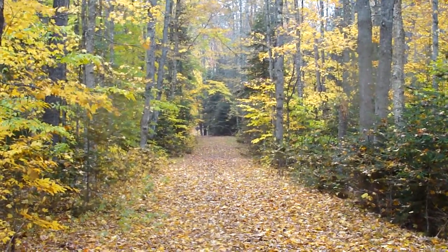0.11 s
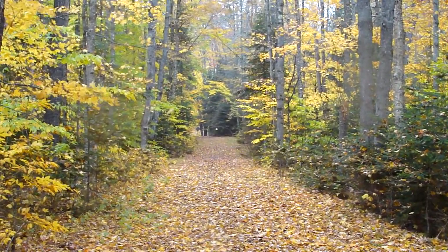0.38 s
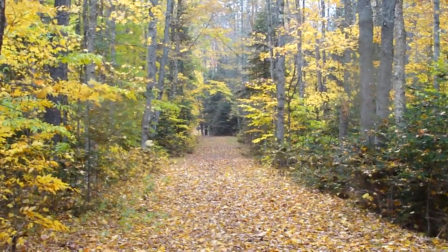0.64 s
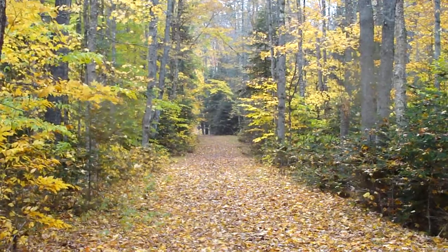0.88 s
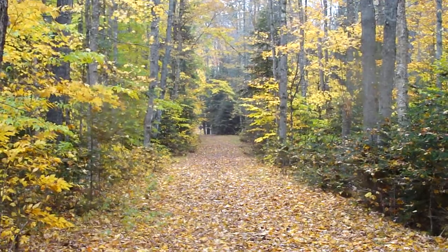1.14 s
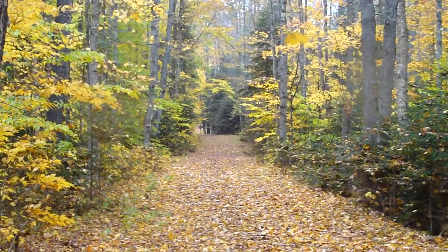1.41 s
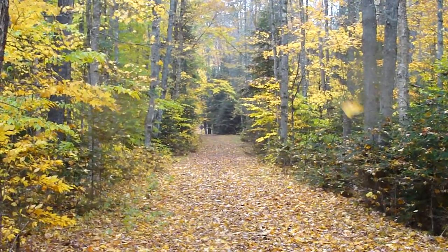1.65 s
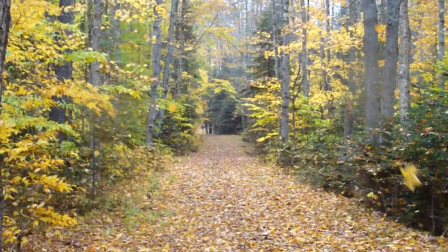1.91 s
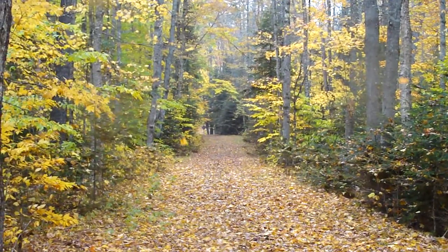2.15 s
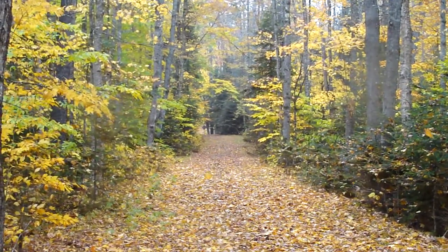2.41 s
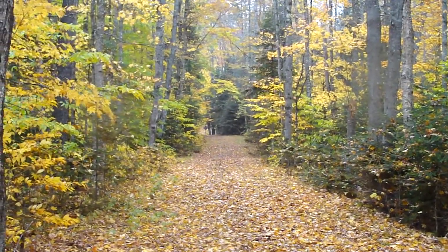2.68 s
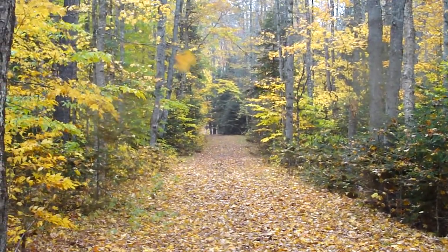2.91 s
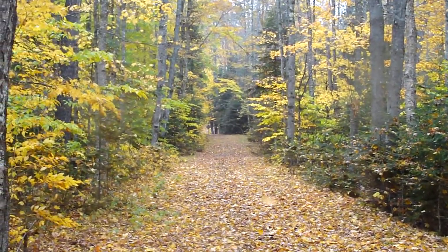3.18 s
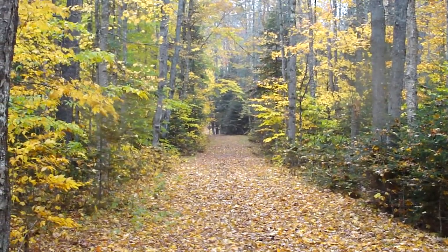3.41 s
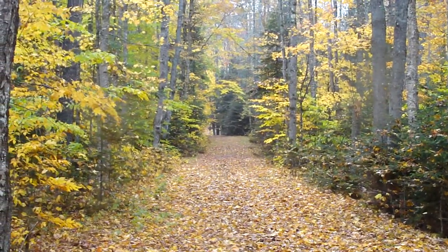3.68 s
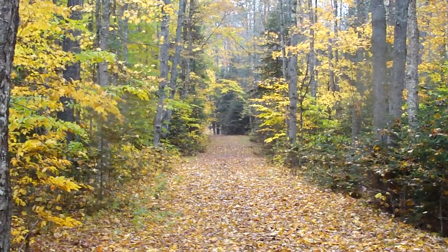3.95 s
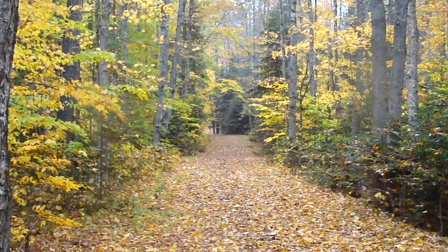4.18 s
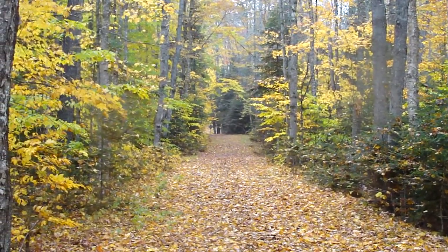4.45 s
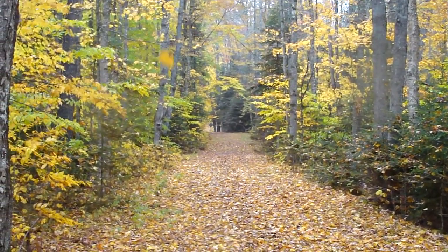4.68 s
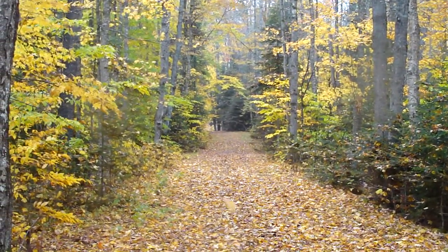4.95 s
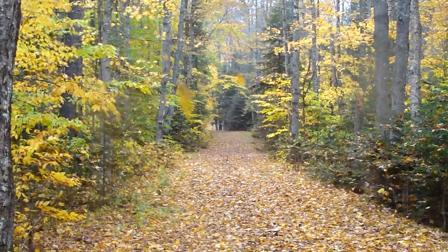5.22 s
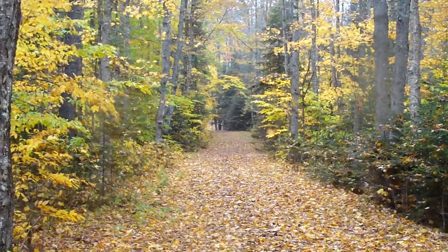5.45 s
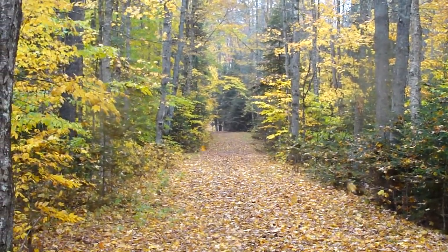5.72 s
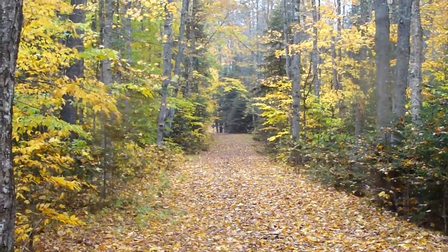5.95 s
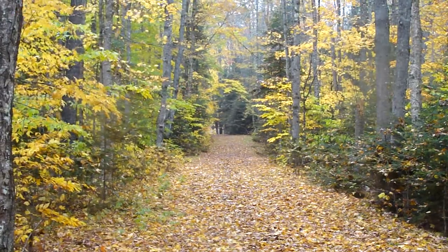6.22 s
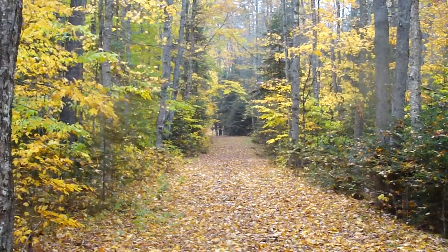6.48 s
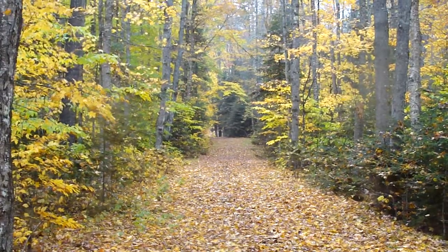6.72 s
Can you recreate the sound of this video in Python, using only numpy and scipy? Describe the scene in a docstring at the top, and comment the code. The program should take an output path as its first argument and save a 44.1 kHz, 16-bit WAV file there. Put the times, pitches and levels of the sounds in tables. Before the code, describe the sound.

An even shower over a leaf-covered woodland track, heard from a fixed microphone close to foliage. A constant mid-to-high hiss carries a fine patter of leaf ticks. Individual drops land nearby with short dry clicks and tiny splashes, one cluster standing out shortly before four seconds. Underneath, soft low thuds and weak rumble from light gusts come and go. The rain barely changes in strength.

```python
"""A forest track in autumn, in steady rain: far drops merge into a hiss of coloured noise, and nearer
drops tick as short impulses that ring dry leaves. Many land close by, with short rings and a brief
splash of noise. Light gusts buffet the microphone: low noise in lumps, and thumps made of a few brief swings."""
import sys
import numpy as np
from scipy import signal
from scipy.fft import rfft, irfft, next_fast_len
from scipy.io import wavfile

SR = 44100
rng = np.random.default_rng(int(sys.argv[2]) if len(sys.argv) > 2 else 0)


def wrap_up_sound(samples):
    """Save the sound to the file named by the first command line argument, as 16-bit audio."""
    columns = np.atleast_2d(samples).T
    # keep every value between -1 and 1, then stretch to whole-number steps
    tamed = np.clip(columns, -1, 1)
    steps = np.round(tamed * 32767).astype(np.int16)
    wavfile.write(sys.argv[1], SR, steps)


def natural_amplitude(level_db):
    """Convert a level in decibels to a linear amplitude factor, elementwise."""
    exponent = np.asarray(level_db, float) / 20
    return 10 ** exponent


N = 302085   # samples

# relative spectrum of the rain after forest and distance: (frequency [Hz], density [dB per Hz])
RAIN_COLOUR = [(30, -70), (100, -33.5), (190, -22.5), (280, -15.5), (420, -13), (680, -8), (1300, -4.5),
               (2200, -2.5), (3500, -1), (4600, -2.5), (5900, -3.5), (7500, -11), (9500, -15), (10900, -21),
               (14000, -37)]
LEAF_HZ = 3000   # reference pitch for the close drops


def rms_one(x):
    """Scale to rms 1."""
    return x / np.sqrt(np.mean(x ** 2) + 1e-20)


def colour(x, points):
    """Causal (minimum-phase) filter that follows a spectrum of (Hz, dB) points."""
    size = next_fast_len(N + 8192)
    size += size % 2
    hz = np.maximum(np.fft.rfftfreq(size, 1 / SR), 1)
    at, db = np.transpose(points)
    log_gain = np.interp(np.log(hz), np.log(at), db) * np.log(10) / 20
    # folding the cepstrum onto positive times gives minimum phase
    cepstrum = irfft(log_gain, size)
    cepstrum[1:size // 2] *= 2
    cepstrum[size // 2 + 1:] = 0
    response = np.exp(rfft(cepstrum))
    return irfft(rfft(x, size) * response, size)[:N]


def drift(rate):
    """Slow chance: noise twice through a one-pole low-pass at rate [Hz]; spread 1."""
    step, settle = 40, 2000   # samples per slow value, slow values dropped at the start
    r = np.exp(-2 * np.pi * rate * step / SR)
    noise = rng.standard_normal(N // step + 2 + settle)
    slow = signal.lfilter([1], [1, -2 * r, r * r], noise)[settle:]
    return np.interp(np.arange(N) / step, np.arange(len(slow)), rms_one(slow))


def resonate(x, hz, width):
    """One resonance, width [Hz] wide, with gain 1 on top."""
    r = np.exp(-np.pi * width / SR)
    feedback = [1, -2 * r * np.cos(2 * np.pi * hz / SR), r * r]
    return signal.lfilter([(1 - r * r) / 2, 0, (r * r - 1) / 2], feedback, x + 1e-18)


def wind():
    """Eddies pass the microphone ports: low noise broken into lumps."""
    # relative spectrum of the wind noise: (frequency [Hz], density [dB per Hz])
    wind_colour = [(15, -26), (30, -13), (60, -8.5), (120, -6), (190, -7), (300, -10), (600, -74)]
    lumps = natural_amplitude(3.0 * drift(15))
    return rms_one(colour(rng.standard_normal(N), wind_colour) * lumps)


def puffs(count=4):
    """Each gust sheds eddies of large to small size; each pushes the diaphragm through a swing or two."""
    # gusts that thump the microphone: (middle [s], length [s], peak level [dB], middle frequency [Hz])
    thumps = [(0.1, 0.11, -48, 110), (0.335, 0.048, -43, 150), (0.375, .03, -42, 165),
              (0.415, 0.042, -44, 125), (0.542, 0.044, -50, 80), (0.59, 0.039, -44, 130),
              (0.658, 0.044, -53, 75), (0.785, .03, -47, 150), (0.835, 0.06, -43, 100),
              (1.0, 0.014, -37, 150), (1.05, 0.031, -50, 140), (1.098, 0.049, -47, 140),
              (1.156, 0.043, -54, 130), (1.236, .04, -50, 80), (1.4, .06, -53, 90), (1.74, 0.046, -60, 80),
              (2.3, 0.042, -59, 65), (2.5, 0.048, -59, 110), (2.765, 0.025, -48, 85),
              (2.988, 0.04, -54, 60), (3.037, 0.006, -44, 150), (3.102, .04, -53, 120),
              (3.163, 0.024, -40, 134), (3.24, 0.037, -53, 80), (3.385, .03, -55, 100),
              (3.585, 0.0306, -49, 115), (4.1, 0.042, -58, 90), (4.315, 0.06, -51, 80),
              (4.725, 0.05, -46, 105), (4.785, .02, -54, 70), (5.1, 0.035, -58, 110),
              (5.847, 0.035, -51, 90), (5.92, 0.068, -54, 65), (5.996, 0.031, -49, 125),
              (6.08, 0.049, -60, 60), (6.27, 0.074, -53, 110)]
    eddy_octaves, puff_cycles = 0.6, 0.45   # span of eddy pitches, Gaussian spread of a puff
    eddy_spread_db, large_eddy_loss_db = 1.5, 3   # chance in force (plus or minus), largest below smallest
    out, steps = np.zeros(N), np.linspace(-.5, .5, count)[:, None]
    chances = rng.random((len(thumps), count, 3))
    for (middle, length, gust_db, gust_hz), draws in zip(thumps, chances):
        near = np.arange(max(int((middle - .15) * SR), 0), min(int((middle + .15) * SR), N))
        place, force, turn = draws.T[:, :, None]
        # evenly over the gust, sizes in random order
        spread = (np.argsort(place, axis=0) + .5) / count - .5
        eddy_hz = gust_hz * 2 ** (eddy_octaves * steps)
        cycles = (near / SR - middle - length * spread) * eddy_hz
        eddy_db = eddy_spread_db * (2 * force - 1) + large_eddy_loss_db * steps
        swell = np.exp(-.5 * (cycles / puff_cycles) ** 2)
        swing = np.sin(2 * np.pi * (cycles + turn))
        gust = np.sum(natural_amplitude(eddy_db) * swell * swing, axis=0)
        out[near] += natural_amplitude(gust_db) * gust / np.abs(gust).max()
    return out


def far_rain():
    """Countless far drops: smooth noise that shimmers a little as boughs shed their water."""
    shimmer = natural_amplitude(0.63 * drift(24))
    return rms_one(colour(rng.standard_normal(N) * shimmer, RAIN_COLOUR))


def ticks(count=14):
    """Nearer drops come at random in loose clumps; each rings a leaf of its own size for a few cycles."""
    ticks_per_s, tick_cycles = 1900, 2.36   # typical rate, leaf pitch over resonance width
    tick_spread_db, largest_tick_db = 5.5, 10   # above the smallest tick
    size_db = np.minimum(tick_spread_db * rng.exponential(1, N), largest_tick_db)
    sizes = natural_amplitude(size_db) * rng.choice([-1, 1], N)
    clumps = natural_amplitude(2.2 * drift(12))
    born = rng.random(N) < ticks_per_s * clumps / SR
    leaf = rng.integers(0, count, N)
    # equal power per Hz from every leaf size, before the forest and distance colour it
    rings = np.zeros(N)
    for k, hz in enumerate(np.geomspace(350, 10000, count)):
        rings += resonate(sizes * born * (leaf == k), hz, hz / tick_cycles)
    return rms_one(colour(rings, RAIN_COLOUR))


def patter(count=220):
    """Close drops at random moments, more of them high in pitch; low ones sound softer."""
    top_db, spread_db, db_per_octave = -22.5, 0.5, 11   # slope holds below LEAF_HZ
    when, pitch, force = rng.random((count, 3)).T
    hz = 700 * (8500 / 700) ** np.sqrt(pitch)
    octaves_below = np.log2(np.minimum(hz / LEAF_HZ, 1))
    db = top_db + spread_db * np.log(force + 1e-9) + db_per_octave * octaves_below
    return list(zip(.01 + when * (N / SR - .01), db, hz))


def close_drops():
    """A sharp hit rings for a few cycles; a splash of droplets follows for some milliseconds."""
    # close drops at set times, loud and soft; a row for each ringing pitch, one hit may have several:
    # (time of the ring's peak [s], peak level of the ring ahead of the band-pass [dB], pitch [Hz])
    placed = [(0.124, -12, 2900), (0.1736, -15, 1900), (0.3013, -14, 8000), (0.364, -11, 3390),
              (0.3969, -16, 8500), (0.4, -12, 4520), (0.4093, -11, 5300), (0.4654, -8.5, 4150),
              (0.4657, -13, 7460), (0.6994, -15, 2300), (0.7283, -14, 4500), (0.821, -14, 8300),
              (0.86, -14, 5000), (0.8693, -23, 2800), (0.8942, -23, 2700), (0.9002, -16, 1900),
              (0.9004, -12, 5500), (0.9141, -21, 8300), (0.9477, -18, 6800), (0.9502, -12, 5200),
              (0.9974, -11, 3500), (1.0088, -10, 4840), (1.0092, -18, 2700), (1.139, -10.5, 3200),
              (1.163, -6, 6900), (1.215, -12, 7150), (1.3297, -11, 5000), (1.3298, -14, 1790),
              (1.3332, -20.5, 1000), (1.3432, -18, 7000), (1.362, -16, 7450), (1.3939, -17, 8000),
              (1.3935, -10, 1680), (1.398, -16, 1700), (1.4239, -18, 8000), (1.4409, -14, 8400),
              (1.4454, -15, 3600), (1.4678, -12, 7000), (1.5692, -24, 2800), (1.5895, -17, 4570),
              (1.6845, -20, 8300), (1.813, -12, 4490), (1.852, -21, 8300), (1.8868, -13, 4410),
              (1.9026, -18, 2400), (1.9183, -13, 8500), (1.9427, -16, 4800), (1.9571, -18, 8300),
              (2.0725, -19, 1500), (2.1104, -15, 8300), (2.1251, -17, 8300), (2.144, -15, 8000),
              (2.1706, -19, 7500), (2.2461, -9.5, 6300), (2.2661, -15, 8300), (2.3334, -17, 8300),
              (2.3897, -9, 5200), (2.439, -16, 1760), (2.4637, -20, 8300), (2.5015, -14, 4430),
              (2.5711, -21, 960), (2.6784, -22, 8300), (2.7119, -18, 3850), (2.715, -11, 3000),
              (2.7308, -15, 7500), (2.8795, -19, 8300), (2.8872, -16, 2970), (3.1226, -11.5, 2800),
              (3.229, -20, 1600), (3.2294, -14, 7450), (3.2608, -15, 8500), (3.3266, -11, 3000),
              (3.3654, -16, 8400), (3.6596, -12, 7500), (3.6785, -12, 4200), (3.6784, -13.5, 1750),
              (3.6793, -33.5, 320), (3.6797, -7, 4200), (3.68, -14, 1150), (3.6806, -8.5, 5300),
              (3.682, -17, 2200), (3.686, -23, 1200), (3.6862, -19, 5800), (3.689, -26, 1100),
              (3.7877, -10, 3870), (3.7875, -12, 7900), (3.8354, -20, 1100), (3.8627, -17, 8060),
              (4.0205, -15, 7500), (4.0426, -17, 8300), (4.125, -15, 3220), (4.1444, -14, 4830),
              (4.4558, -15, 3390), (5.0675, -15, 2500), (5.69, -16, 4500), (5.7027, -18, 8000),
              (5.703, -19, 1600), (5.726, -13, 2970), (5.732, -13, 2930), (5.904, -14, 5000),
              (5.9464, -21, 1600), (6.0623, -18, 7960), (6.1373, -16, 2190), (6.2214, -15, 7440),
              (6.2388, -18, 1560), (6.3473, -12, 4560), (6.523, -17, 4600), (6.6248, -12, 3200),
              (6.6884, -18, 2200), (6.7623, -15, 2970), (6.8066, -14, 7000), (6.806, -17, 2800),
              (6.8261, -19, 8300)]
    ring_cycles, cycles_power = 3.1, 0.2   # pitch over width at LEAF_HZ; high pitches ring more cycles
    splash_s, splash_delay_s, splash_db = 0.0075, 0.00046, -13   # decay, delay after hit, peak re ring
    out, t = np.zeros(N + 882), np.arange(882) / SR
    hit = np.eye(1, len(t))[0]
    drops = patter() + placed
    fade = np.exp(-t / splash_s) * (t > splash_delay_s)
    droplets = rng.standard_normal((len(drops), len(t))) * fade
    for (s, peak_db, hz), splash in zip(drops, droplets):
        width = hz / (ring_cycles * (hz / LEAF_HZ) ** cycles_power)
        # the narrow ring, then a wider resonance for the soft contact
        ring = resonate(resonate(hit, hz, width), hz, 2.6 * width)
        splash = resonate(splash, hz, hz * 0.46)
        drop = ring / np.abs(ring).max() + natural_amplitude(splash_db) * splash / np.abs(splash).max()
        start = int(s * SR) - np.abs(ring).argmax()
        out[start:start + len(t)] += natural_amplitude(peak_db) * drop
    # band-pass on the close drops: less bass, and the microphone rolls off the highest treble
    band = signal.butter(2, [250, 10000], "band", fs=SR, output="sos")
    return signal.sosfilt(band, out[:N])


def scene():
    """Rain and wind follow their levels; close drops and thumps stand on top."""
    # the shower, gain on hiss and ticks together: (time [s], level [dB])
    shower = [(0.0, -26), (1.49, -25), (1.81, -25.5), (2.17, -25.5), (6.01, -27), (6.85, -26)]
    # the breeze, rumble on the microphone: (time [s], level [dB])
    breeze = [(0.0, -54), (0.15, -66), (0.38, -58), (0.53, -61), (1.28, -62), (1.45, -71), (2.59, -69),
              (3.03, -56), (3.64, -70.5), (5.07, -74), (5.44, -76), (6.07, -64), (6.6, -74), (6.85, -76)]
    now = np.arange(N) / SR
    rain = natural_amplitude(-2) * far_rain() + natural_amplitude(-5) * ticks()
    rain_gain = natural_amplitude(np.interp(now, *np.transpose(shower)))
    wind_gain = natural_amplitude(np.interp(now, *np.transpose(breeze)))
    mix = rain_gain * rain + wind_gain * wind()
    mix = mix + close_drops() + puffs()
    return mix[None]


def roll_off(x):
    """The treble ends steeply here."""
    return signal.sosfilt(signal.butter(12, 11015, fs=SR, output="sos"), x)


def record(dry):
    """A low sampling rate cuts the top steeply: an elliptic low-pass at 11020 Hz."""
    low_pass = signal.ellip(12, .3, 75, 11020, fs=SR, output="sos")   # ripple and stop band in dB
    return roll_off(signal.sosfilt(low_pass, dry))


dry = scene()
out = record(dry)
wrap_up_sound(out)
```